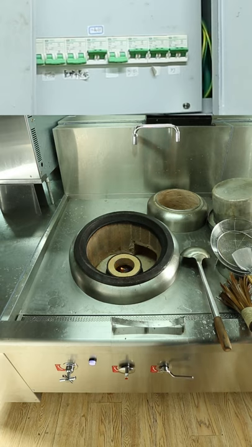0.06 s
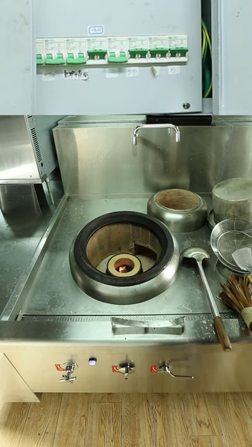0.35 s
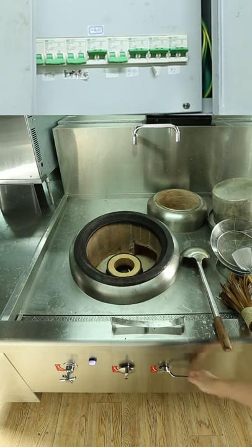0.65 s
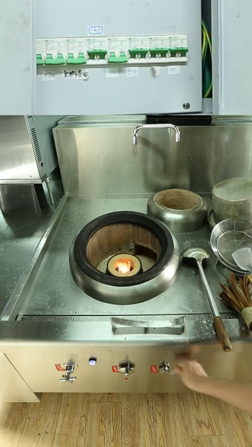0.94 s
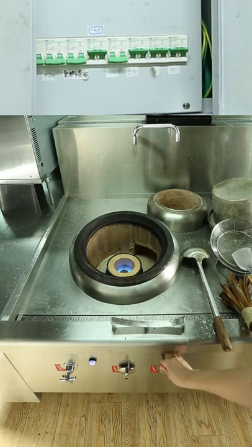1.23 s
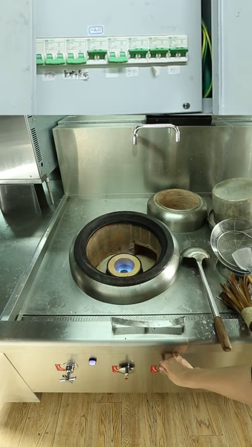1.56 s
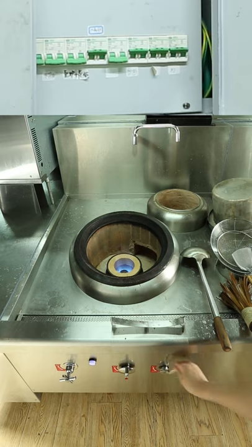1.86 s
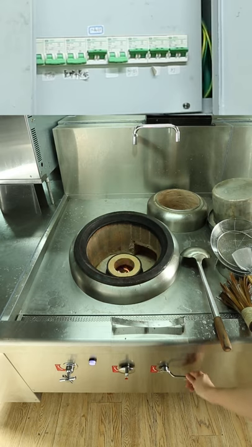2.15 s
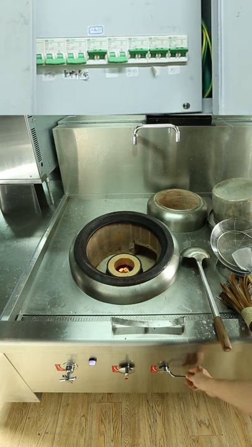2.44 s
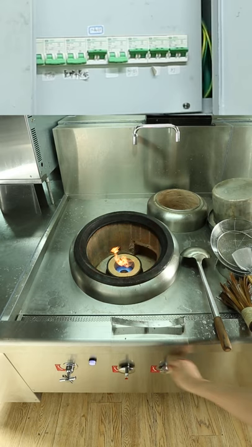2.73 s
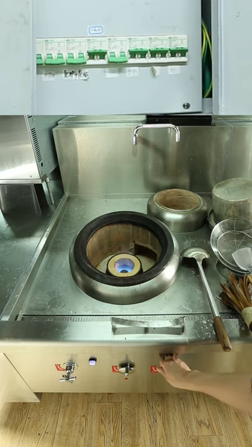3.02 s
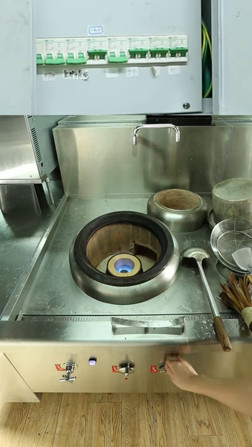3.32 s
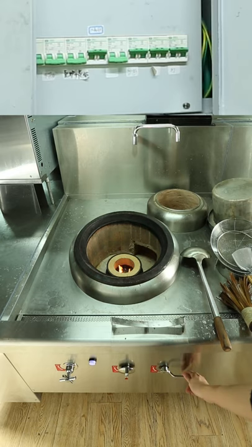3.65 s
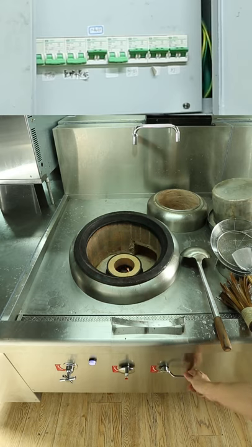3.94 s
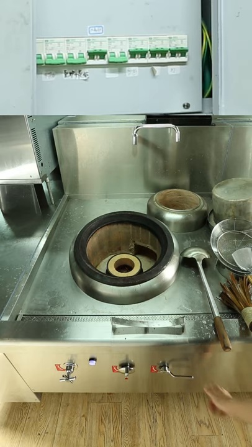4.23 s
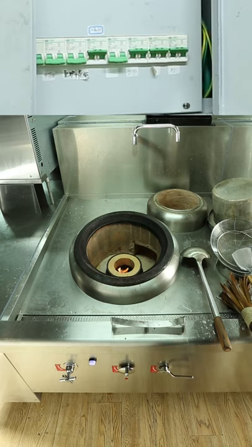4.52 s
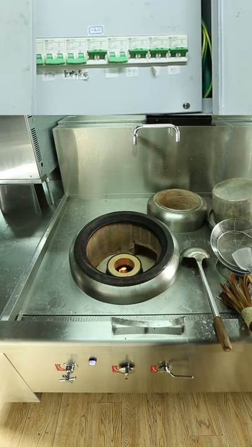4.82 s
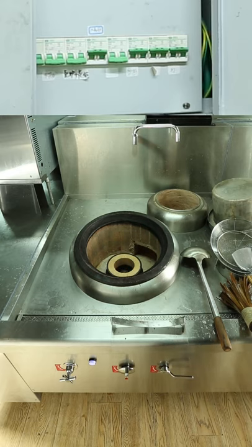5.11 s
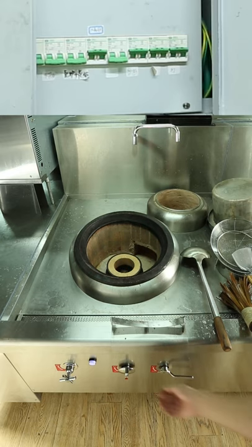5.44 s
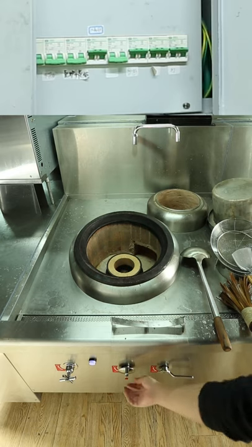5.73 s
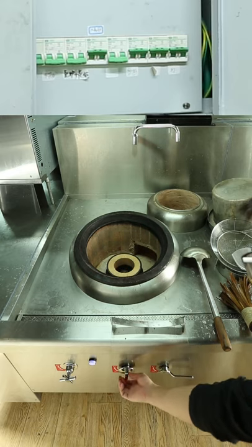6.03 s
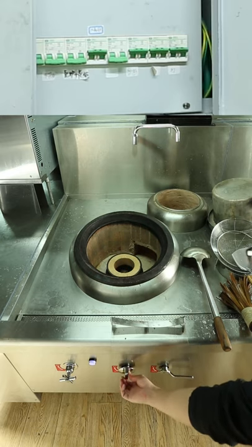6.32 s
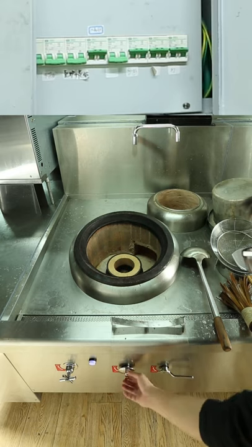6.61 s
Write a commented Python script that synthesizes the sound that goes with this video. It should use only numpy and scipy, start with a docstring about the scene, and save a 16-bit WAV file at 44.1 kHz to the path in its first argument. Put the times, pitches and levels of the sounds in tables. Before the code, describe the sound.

A blower drones evenly throughout, air rushing through a duct in a hard-walled kitchen. With it come the bright electric buzz of a spark igniter and the faint flutter of a small flame in a wok burner. At about 1 second the buzz dips and the gas catches, swelling into a much louder, hollow, hissing roar, with a small pop near 1.4 seconds. At 2.1 seconds the roar collapses with a short, high spit from the valve. Another spit with a thin whistle at about 2.75 seconds starts a second roar, just as loud, which dies back at 3.6 seconds. The igniter drops out around 3.7 seconds and returns just after 4. From there its slightly metallic buzz continues over the blower, while the small flame flutters, gives a faint puff near 5.4 seconds and fades toward the end at about 7 seconds.

```python
"""A steel kitchen: a blown gas wok burner, its valve opened twice for about a second of roar.
The turbulent flame sounds through the fire bowl's resonances and dies back to a small flutter.
The igniter's arc buzzes at twice the mains frequency and rings the burner head.
Gas spits through the nearly shut valve; the blower drones through its duct throughout."""
import sys
import numpy as np
from scipy import signal
from scipy.fft import rfft, irfft, next_fast_len
from scipy.io import wavfile
from scipy.ndimage import map_coordinates

SR = 44100
rng = np.random.default_rng(int(sys.argv[2]) if len(sys.argv) > 2 else 0)


def materialize(psi):
    """Save the field psi as 16-bit PCM at rate SR to the path in sys.argv[1].

    A 1-D psi becomes a single channel; in a 2-D psi each row is a channel.
    """
    bounded = np.clip(np.atleast_2d(psi).T, -1, 1)
    quanta = np.round(bounded * 32767).astype(np.int16)
    wavfile.write(sys.argv[1], SR, quanta)


N = 302967
TIME_S = np.arange(N) / SR
FFT_SIZE = next_fast_len(N)
FREQS_HZ = np.fft.rfftfreq(FFT_SIZE, 1 / SR)

# valve turns: open t/s, flame blue t/s, shut t/s, rise/s, roar level/dB, hiss re roar/dB
VALVE_TURNS = [(1.025, 1.085, 2.11, .195, -22.3, -1), (2.765, 2.79, 3.61, .09, -22.7, -1.7)]
# fire bowl and burner head resonances: f/Hz, half width/Hz, level/dB
BOWL_MODES = [(118.2, 11.8, -14), (228, 16.3, -5), (295, 28.8, 1.5), (385.5, 18.4, -2), (440, 14, -8),
              (549, 42, -7), (766, 40, -15), (921, 58, -9.5), (1023, 20, -7), (1086, 36, -4),
              (1162, 26, -2), (1288, 49.6, -1), (1470, 96, -14), (1580, 18, -7), (1735, 36, -8),
              (1896, 175, -13.5), (1997, 17, -12), (2510, 49, -17), (2907, 193, -16.5), (3430, 79, -13),
              (3636, 90, -13), (3860, 265, -18.5), (5100, 68, -27), (6160, 200, -32), (8570, 363, -35.5)]
# broad turbulence spectrum: f/Hz, level/dB
TURBULENCE_SPECTRUM = [(30, -73), (70, -26), (200, -16.5), (670, -53), (1500, -34.5), (2300, -22),
                       (3200, -64), (4500, -30), (7000, -37), (10000, -45.5), (15500, -56)]
# hiss echoes off steel top and splashback: delay/s, level/dB
STEEL_ECHOES = [(.0019, -16), (.0043, -14.5), (.0072, -13)]
# small flame lingering in the head: t/s, level/dB
PILOT_LEVELS = [(0, -48.5), (.42, -50.3), (.55, -53), (1.0, -52.8), (2.2, -51), (2.7, -45), (3.95, -52.5),
                (4.1, -50.4), (4.65, -49), (5.08, -50.6), (5.22, -53.5), (6.87, -61)]
# gas pockets catching: t/s, level/dB, half length/s
GAS_PUFFS = [(1.055, -39, .04), (1.355, -21.5, .012), (2.87, -26, .02), (3.03, -27, .02),
             (5.362, -44, .022)]
# spark spectrum: f/Hz, level/dB
SPARK_SPECTRUM = [(300, -39), (1200, -26), (2200, -5), (2750, -24), (3300, -6), (4200, 4), (5000, 3),
                  (5700, 0), (7500, -3.5), (8800, -5), (9900, -3), (11000, -7.5), (15500, -13.5)]
# snap paths, direct and off the steel: delay/s, level/dB
SPARK_PATHS = [(.00015, 2), (.001, 1), (.0038, -1.5), (.0062, -8)]
# burner head rings: cold f/Hz, hot f/Hz, width/Hz, cold level/dB, hot level/dB
HEAD_MODES = [(2070, 2290, 200, -5.5, -14), (3190, 3490, 200, -9, -1.5), (9720, 10000, 700, -12, -14)]
# steel rings of constant pitch: f/Hz, width/Hz, level/dB
STEEL_MODES = [(4130, 350, -12), (5000, 500, -9), (6850, 500, -17)]
# arc dropouts: out t/s, restrike t/s, recovery/s, depth/dB
ARC_DROPOUTS = [(.978, 1.19, .16, -17), (3.69, 4.04, .01, -40)]
# gas spits: t/s, level/dB, fall time/s, whistle f/Hz, whistle level/dB
VALVE_SPITS = [(2.102, -39.3, 0.1, 12200, -5), (2.748, -48, 0.15, 8410, 18), (2.79, -46, .09, 11500, -7)]
# air duct resonances: f/Hz, half width/Hz, level/dB
DUCT_MODES = [(124, 23, -11.5), (228.4, 35.4, -2), (295, 44, -2.5), (405, 44, -3.5), (551, 28, -3),
              (822, 25, -10.5), (906, 27, -12), (1060, 20, -7.5), (1111, 23, -3.5), (1247, 54, -30.5),
              (1470, 41, -9.5), (1603, 162, -7), (2047, 34, -3.5), (2250, 220, -11)]
# broad air rush: f/Hz, level/dB
AIR_SPECTRUM = [(30, -46), (80, -30), (300, -32), (700, -16.5), (1500, -50), (2800, -18), (4000, -19.5),
                (6000, -28.5), (10000, -40), (15500, -45)]
# blower tones: f/Hz, rms level/dB
DRONE_TONES = [(237, -61), (588, -60), (721, -82)]


def flame(flutter_db=.74, flutter_hz=30, bass_hz=600, hiss_hz=2600):
    """Fluttering turbulence rings the bowl; its hiss echoes off the steel."""
    bass_gain, body_gain, hiss_gain = flame_gains()
    eddies = rng.standard_normal(N) * amp(flutter_db * wander(flutter_hz))
    roar = unit(filtered(eddies, resonant(BOWL_MODES, TURBULENCE_SPECTRUM)))
    roar = map_coordinates(roar, [np.cumsum(bowl_pitch(body_gain))], mode="mirror")
    bass = filtered(roar, lowpass(bass_hz))
    hiss = filtered(roar, 1 - lowpass(hiss_hz))
    body = roar - bass - hiss
    hiss += sum(amp(db) * np.roll(hiss, round(delay_s * SR)) for delay_s, db in STEEL_ECHOES)
    return bass * bass_gain + body * body_gain + hiss * hiss_gain


def flame_gains(swell_db_per_s=1, hiss_swell_db_per_s=3.6, yellow_db=-13, catch_s=.055, hiss_power=1.22):
    """Bass, body and hiss gains: pilot, puffs and jet add in power."""
    pilot = amp(curve(PILOT_LEVELS))
    puffs = sum(amp(db) * np.exp(-((TIME_S - at_s) / half_s) ** 2) for at_s, db, half_s in GAS_PUFFS)
    power = (amp([[3], [0], [-4]]) * pilot) ** 2  # bass, body, hiss in dB
    power += (amp([[4], [0], [-2]]) * puffs) ** 2
    for open_s, blue_s, shut_s, rise_s, db, hiss_db in VALVE_TURNS:
        held_s = np.clip(TIME_S, open_s, shut_s) - open_s
        roar = jet(open_s, shut_s, rise_s) * amp(db + swell_db_per_s * held_s)
        # a yellow flame barely hisses; the hiss snaps in as it turns blue
        yellow = amp(yellow_db) * jet(open_s, shut_s, catch_s)
        blue = jet(blue_s, shut_s, catch_s)
        hiss = np.maximum(yellow, blue) ** hiss_power * amp(db + hiss_db + hiss_swell_db_per_s * held_s)
        power += np.array([roar, roar, hiss]) ** 2
    return np.sqrt(power)


def jet(open_s, shut_s, rise_s, collapse_db_per_s=280, pipe_db=-10, burn_off_db_per_s=39):
    """Flow of one valve turn, 0-1: ramp, hold, collapse, slow burn-off of the gas in the pipe."""
    after_s = np.maximum(TIME_S - shut_s, 0)
    release_db = np.maximum(-collapse_db_per_s * after_s, pipe_db - burn_off_db_per_s * after_s)
    return ramp(open_s, rise_s) * amp(release_db)


def bowl_pitch(gain, full_db=-22.5, rise_per_db=.0011, lag_s=.07):
    """Factor on the bowl's resonances: sound is faster in hot gas, and heat lags the flame."""
    heat_db = 20 * np.log10(gain) - full_db
    pole = np.exp(-1 / (lag_s * SR))
    lagged_db = heat_db[0] + signal.lfilter([1 - pole], [1, -pole], heat_db - heat_db[0])
    return 1 + rise_per_db * lagged_db


def igniter(cold_pilot_db=-53.3, hot_pilot_db=-49.5, room_db=-6.5):
    """Sparks ring the steel and the burner head, whose pitch rises as the pilot heats it."""
    heat = np.clip((curve(PILOT_LEVELS) - cold_pilot_db) / (hot_pilot_db - cold_pilot_db), 0, 1)
    cracks, echoes = sparks(heat)
    buzz = unit(filtered(echoes, colour(SPARK_SPECTRUM)))
    for cold_hz, hot_hz, width_hz, cold_db, hot_db in HEAD_MODES:
        head_hz = cold_hz + (hot_hz - cold_hz) * heat
        buzz += amp(cold_db + (hot_db - cold_db) * heat) * ring(cracks, head_hz, width_hz)
    buzz += sum(amp(db) * ring(cracks, np.full(N, hz), width_hz) for hz, width_hz, db in STEEL_MODES)
    buzz = unit(buzz) * arc_gain()
    return buzz + amp(room_db) * kitchen(buzz)


def sparks(heat, rate_hz=99.928, first_s=.0008, crack_s=.000303, jitter_s=.000015, uneven_db=1.55,
           scatter_gain=1.2, cold_drift_hz=2.2, hot_drift_hz=9):
    """One spark per mains half cycle: a bare crack and a burst of dense echoes."""
    index, phase = np.divmod((TIME_S - first_s) * rate_hz + 1, 1)
    age_s = phase / rate_hz
    size, late = rng.standard_normal((int(index[-1]) + 1, 2))[index.astype(int)].T
    strength = amp(uneven_db * size)
    cracks = np.sinc((age_s - crack_s - jitter_s * late) * SR)
    scatter = scatter_gain * rng.standard_normal(N)
    # hot, moving gas changes the echo pattern faster
    drift = np.cumsum(cold_drift_hz + (hot_drift_hz - cold_drift_hz) * heat) / SR
    patterns = rng.standard_normal((100, int(SR / rate_hz) + 2))
    echoes = map_coordinates(patterns, [drift, age_s * SR], mode="mirror") + scatter
    return cracks * strength, echoes * snap_envelope(age_s) * strength


def snap_envelope(age_s, rise_s=.0001, decay_s=.0017):
    """Each path brings a sudden, decaying burst; they add in power."""
    power = np.zeros(N)
    for delay_s, db in SPARK_PATHS:
        attack = np.clip((age_s - delay_s) / rise_s + 1, 0, 1)
        decay = np.exp(-np.maximum(age_s - delay_s, 0) / decay_s)
        power += (amp(db) * attack * decay) ** 2
    return np.sqrt(power)


def ring(x, hz, width_hz):
    """Two resonators in series following the curve hz; rms 1."""
    carrier = np.exp(2j * np.pi * np.cumsum(hz) / SR)
    pole = np.exp(-np.pi * width_hz / SR)
    for _ in range(2):
        x = 2 * (carrier * signal.lfilter([1 - pole], [1, -pole], x / carrier)).real
    return unit(x)


def arc_gain(still_air_db=-45.3, in_jet_db=-5, fail_s=.012):
    """The arc weakens in the jet and fades in its dropouts."""
    flow = sum(jet(open_s, shut_s, rise_s) for open_s, _, shut_s, rise_s, _, _ in VALVE_TURNS)
    level_db = still_air_db + in_jet_db * flow
    for out_s, restrike_s, recovery_s, depth_db in ARC_DROPOUTS:
        level_db += depth_db * (ramp(out_s, fail_s) - ramp(restrike_s, recovery_s))
    return amp(level_db)


def valve(rise_s=.003, fall_db=22, half_width_hz=220, low_hz=6000, high_hz=13000):
    """Gas squeezed through a narrow gap: short bright hisses, each with a whistle."""
    spits = np.zeros(N)
    band = (1 - lowpass(low_hz)) * lowpass(high_hz)
    for at_s, db, fall_s, whistle_hz, whistle_db in VALVE_SPITS:
        age_s = np.maximum(TIME_S - at_s, 0)
        hiss = unit(filtered(rng.standard_normal(N), band + peak(whistle_hz, half_width_hz, whistle_db)))
        spits += hiss * ramp(at_s, rise_s) * amp(db - fall_db * age_s / fall_s)
    return spits


def blower(air_db=-46.5, waver=.0029, waver_hz=5.4):
    """Air rushes through the duct, with a few slightly wavering tones."""
    air = unit(filtered(rng.standard_normal(N), resonant(DUCT_MODES, AIR_SPECTRUM)))
    clock_s = np.cumsum(1 + waver * wander(waver_hz)) / SR
    tones = sum(amp(db) * np.sin(2 * np.pi * (hz * clock_s + rng.random())) for hz, db in DRONE_TONES)
    return amp(air_db) * air + np.sqrt(2) * tones


def kitchen(x, t60_s=.3, onset_s=.004):
    """Diffuse tail of the hard-walled room."""
    age_s = TIME_S[:SR // 2]
    tail = rng.standard_normal(len(age_s)) * amp(-60 * age_s / t60_s) * (age_s > onset_s)
    return signal.fftconvolve(x, tail / np.linalg.norm(tail))[:N]


def amp(db):
    """dB to gain."""
    return 10 ** (np.asarray(db) / 20)


def unit(x):
    """Scale to rms 1."""
    return x / np.sqrt(np.mean(x ** 2) + 1e-20)


def ramp(start_s, rise_s):
    """Linear rise, 0-1."""
    return np.clip((TIME_S - start_s) / rise_s, 0, 1)


def curve(rows):
    """(t/s, value) rows, interpolated per sample."""
    return np.interp(TIME_S, *np.transpose(rows))


def wander(rate_hz):
    """Slow random motion, rms 1."""
    return unit(filtered(rng.standard_normal(N), (FREQS_HZ > 0) * lowpass(rate_hz)))


def lowpass(hz):
    """Fourth-order low-pass gain."""
    return 1 / (1 + (FREQS_HZ / hz) ** 4)


def peak(hz, half_width_hz, db):
    """Gain of one resonance."""
    return amp(db) / (1 + ((FREQS_HZ - hz) / half_width_hz) ** 2)


def colour(spectrum):
    """Gain from (f/Hz, level/dB) rows, joined on a log axis."""
    hz, db = np.transpose(spectrum)
    return amp(np.interp(np.log(FREQS_HZ + 1), np.log(hz), db))


def resonant(modes, spectrum):
    """Gain of resonances on a broad spectrum."""
    return np.sqrt(sum(peak(*mode) ** 2 for mode in modes) + colour(spectrum) ** 2)


def filtered(x, gain):
    """Apply a gain per frequency."""
    return irfft(rfft(x, FFT_SIZE) * gain, FFT_SIZE)[:N]


def scene():
    """All sources, mono, above the range."""
    return (flame() + blower() + igniter() + valve())[None]


def record(dry, low_cut_hz=52, high_cut_hz=15760):
    """Bass cut and steep band limit."""
    thinned = filtered(dry[0], 1 - lowpass(low_cut_hz))
    taps = signal.firwin(1023, high_cut_hz, window=("kaiser", 9), fs=SR)
    return signal.oaconvolve(thinned, taps, "same")[None]


dry = scene()
out = record(dry)
materialize(out)
```